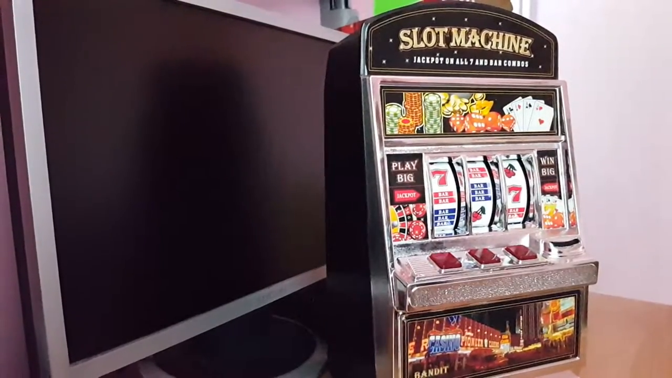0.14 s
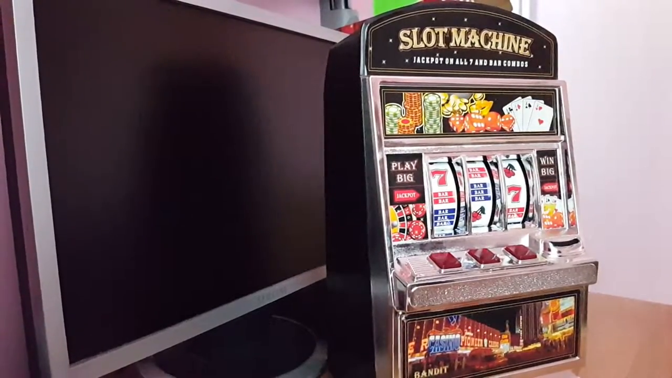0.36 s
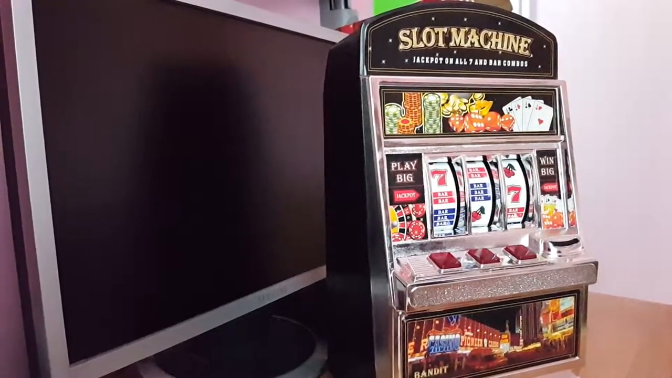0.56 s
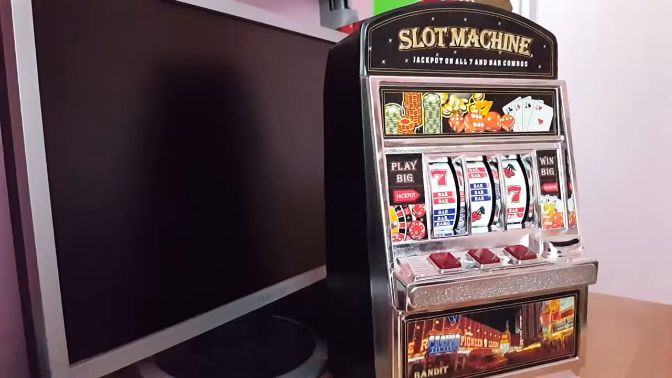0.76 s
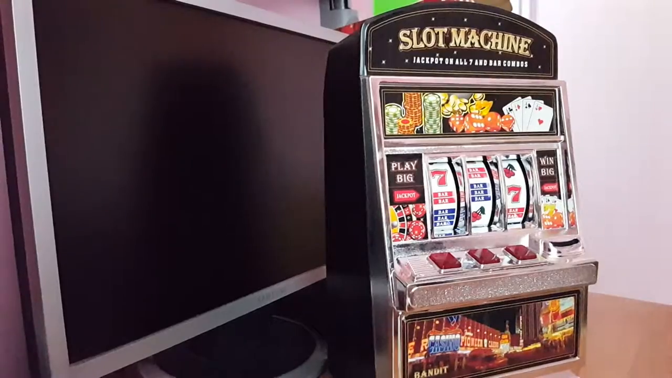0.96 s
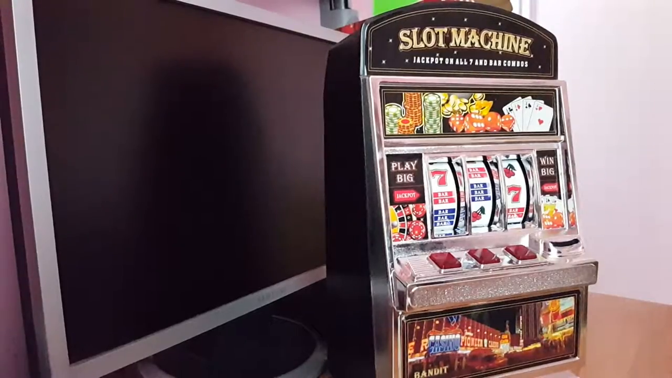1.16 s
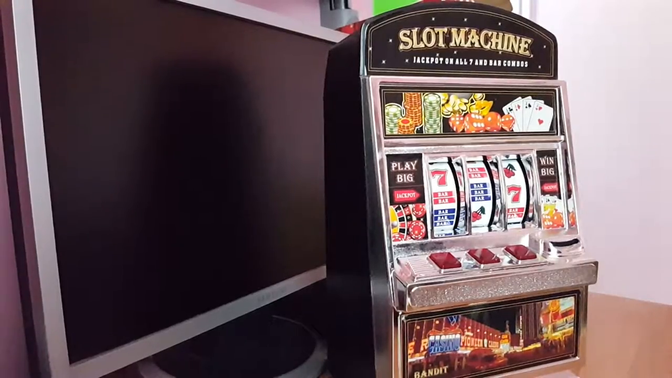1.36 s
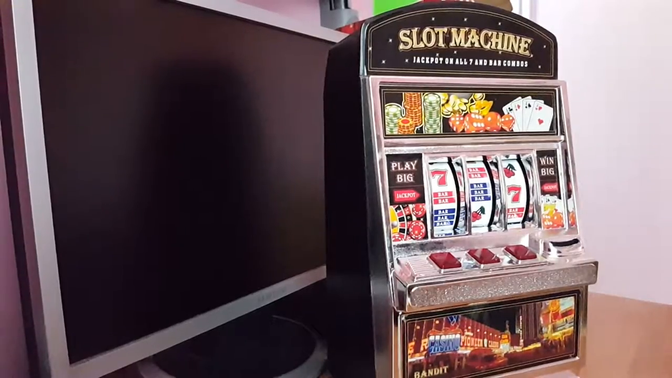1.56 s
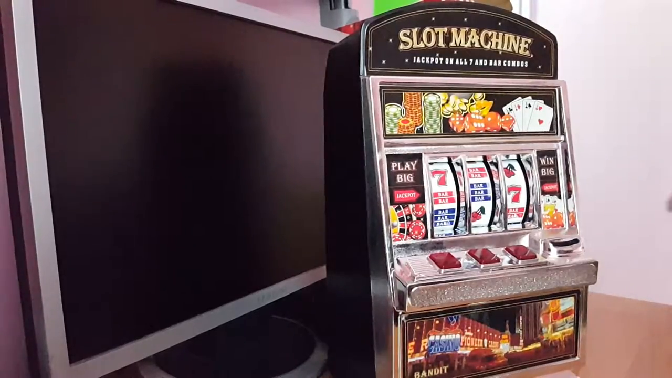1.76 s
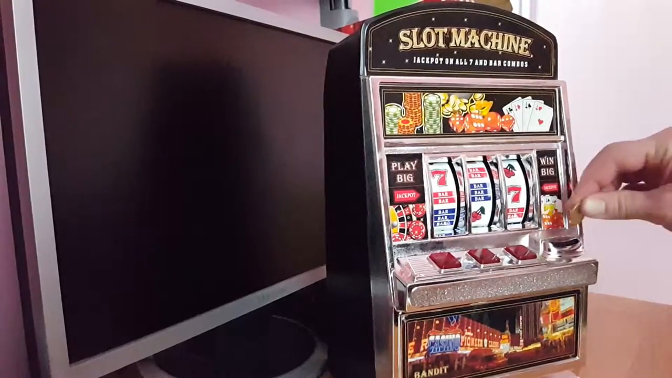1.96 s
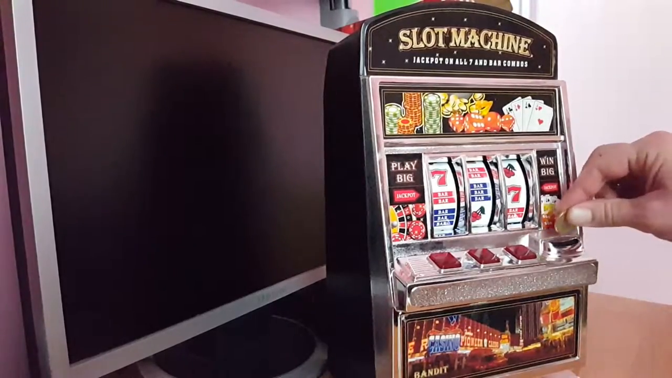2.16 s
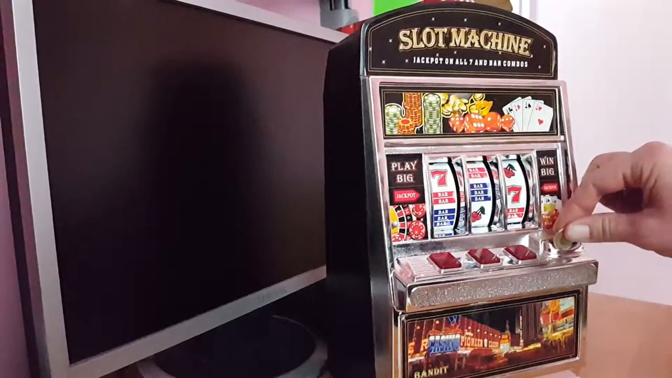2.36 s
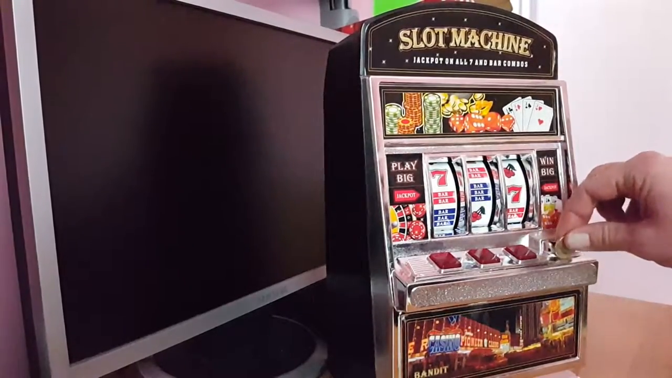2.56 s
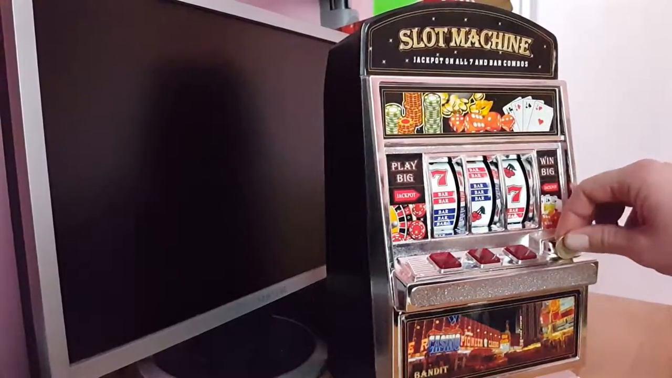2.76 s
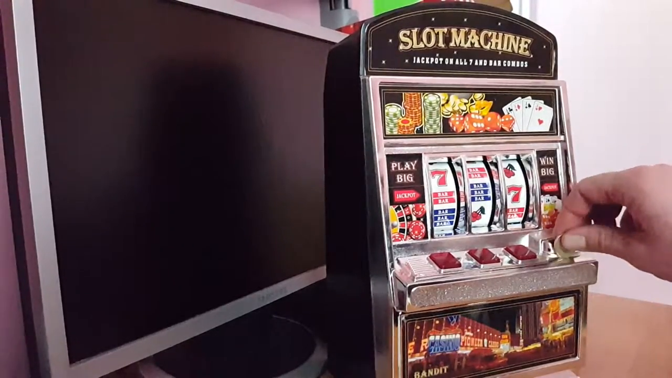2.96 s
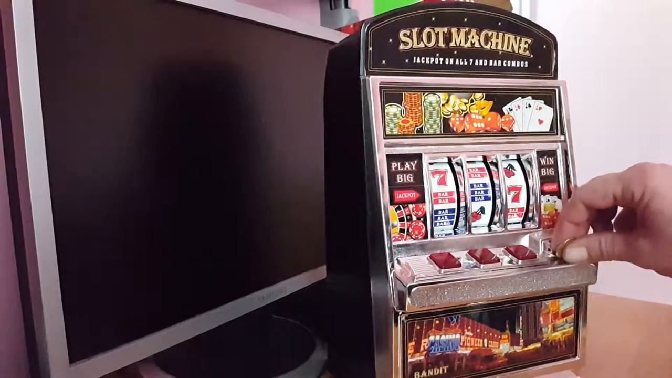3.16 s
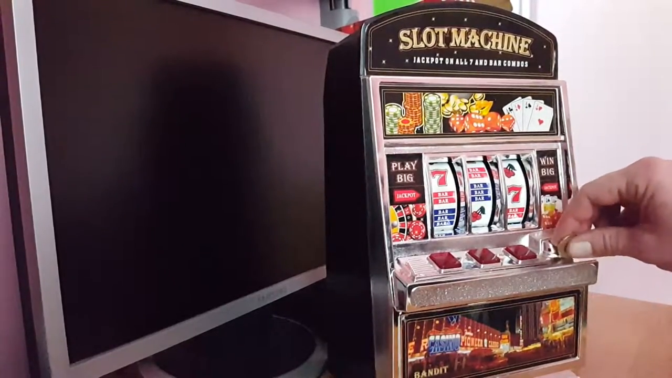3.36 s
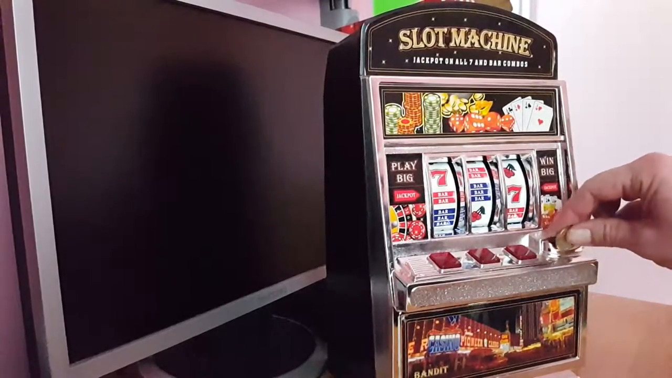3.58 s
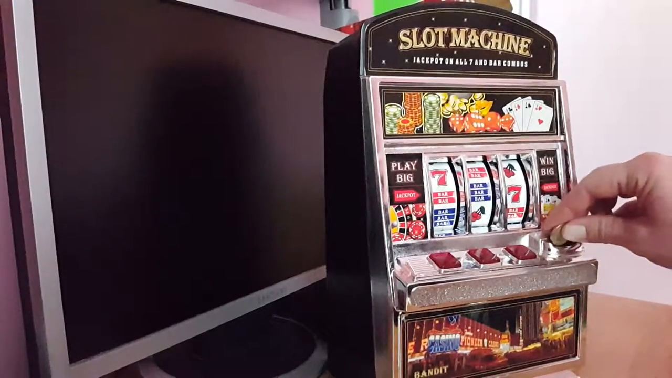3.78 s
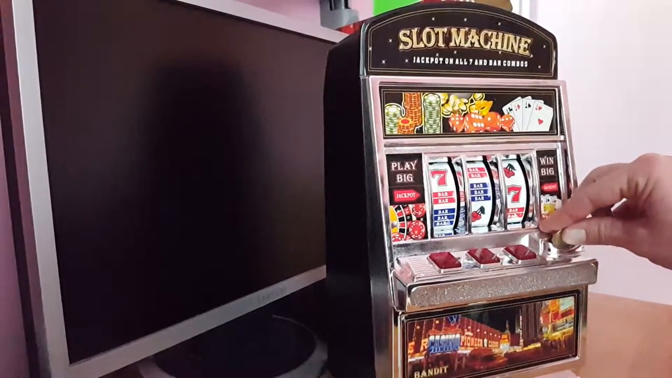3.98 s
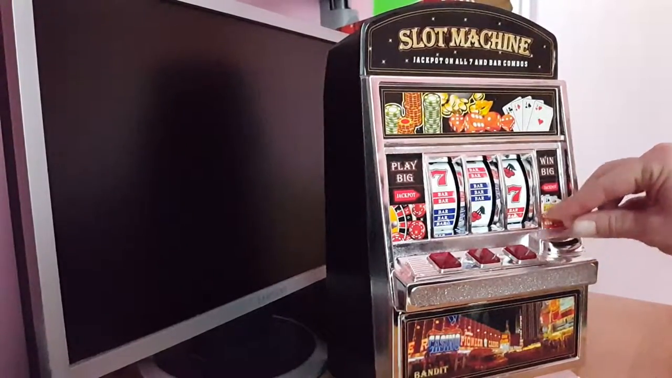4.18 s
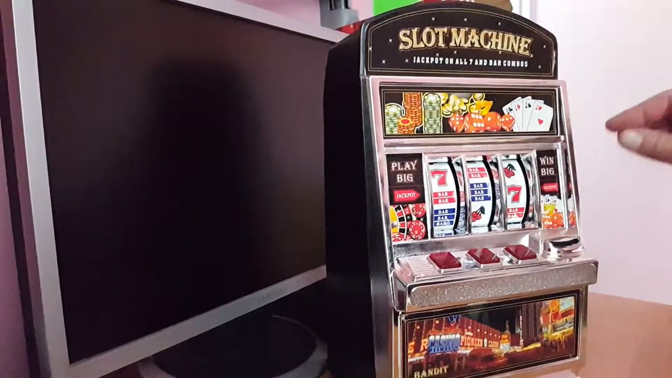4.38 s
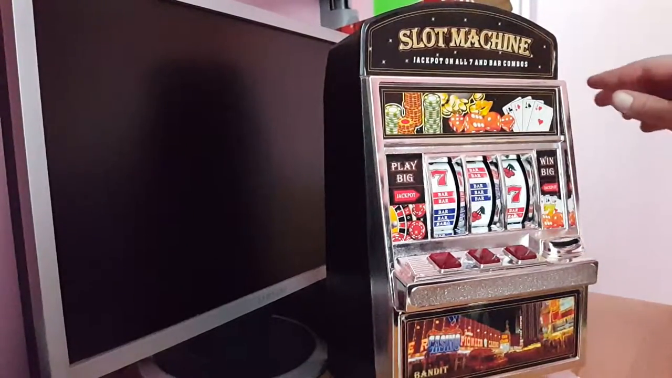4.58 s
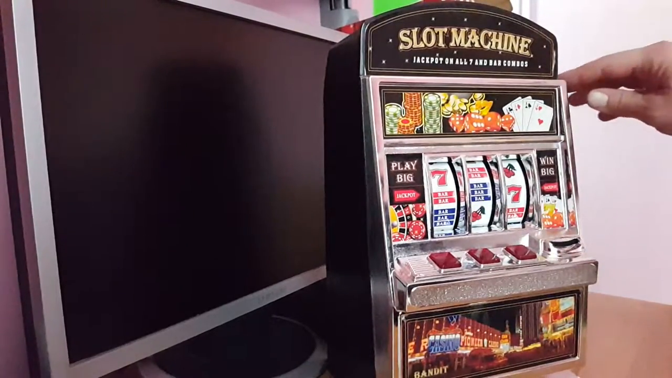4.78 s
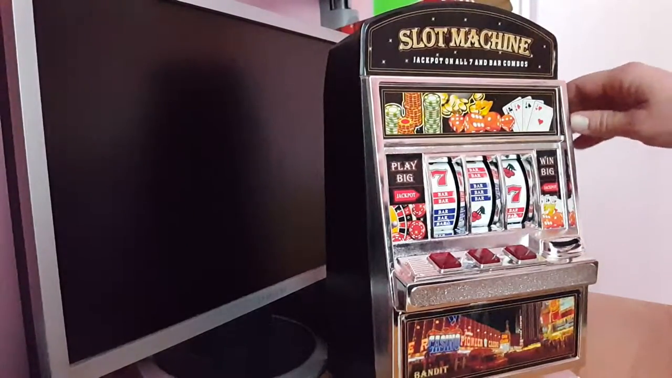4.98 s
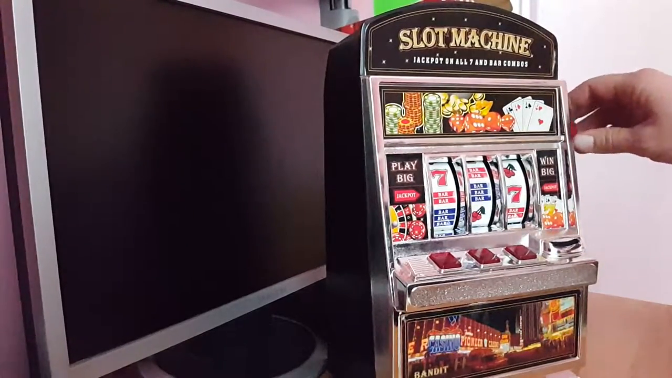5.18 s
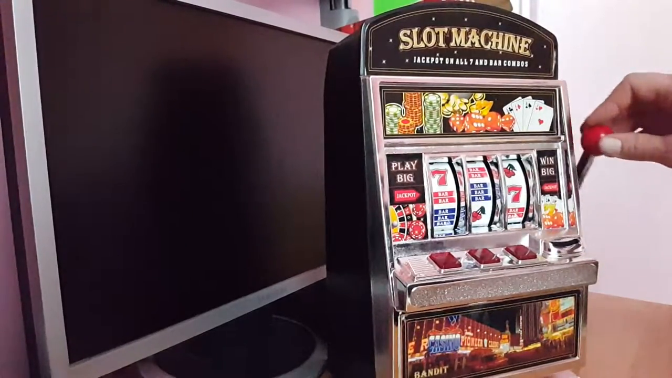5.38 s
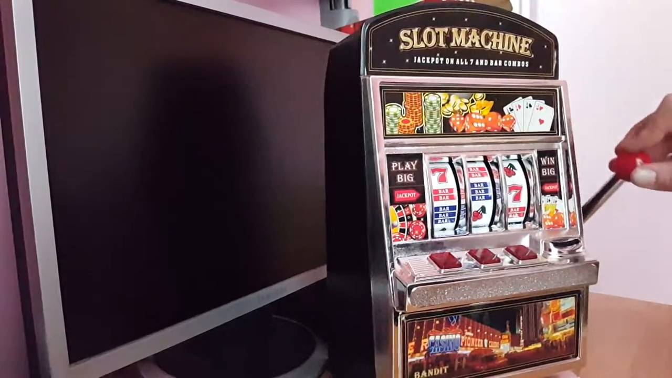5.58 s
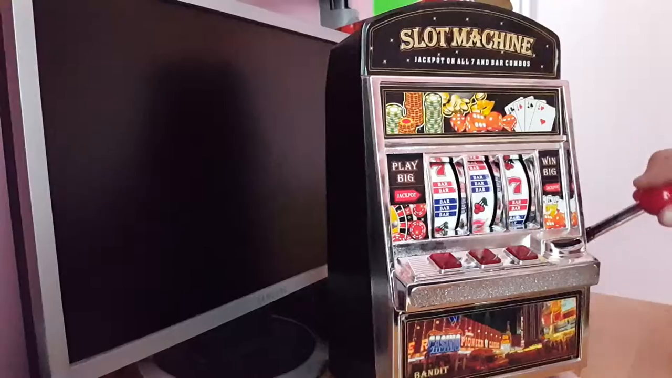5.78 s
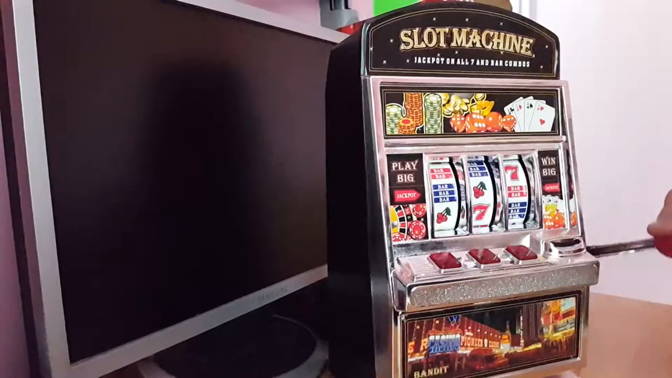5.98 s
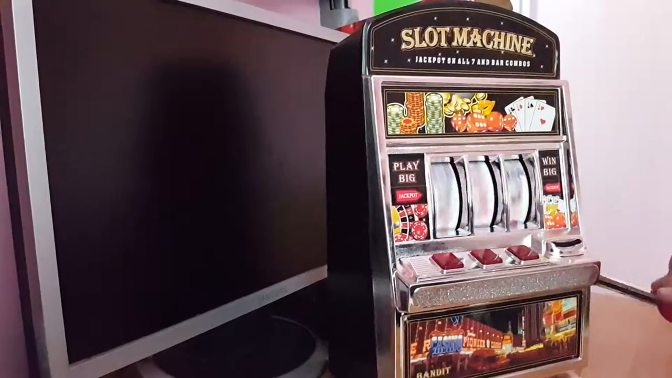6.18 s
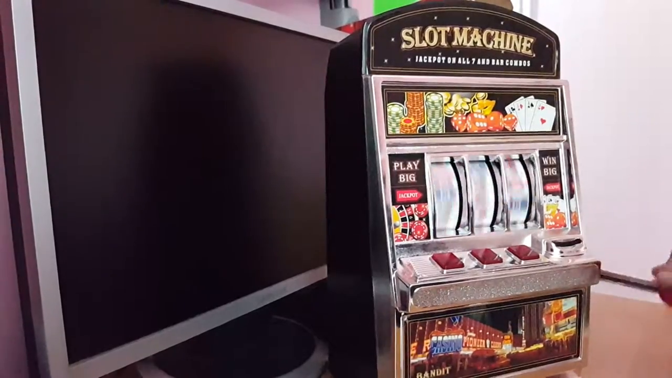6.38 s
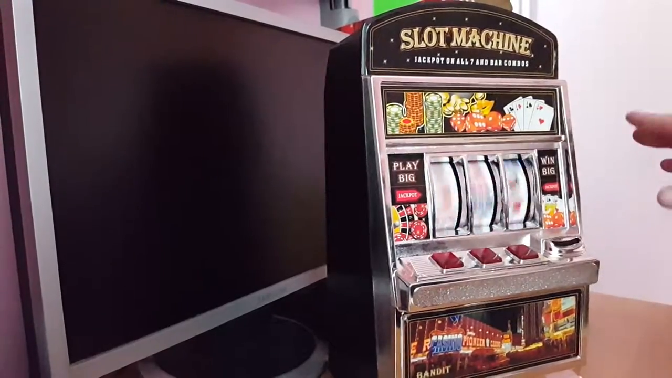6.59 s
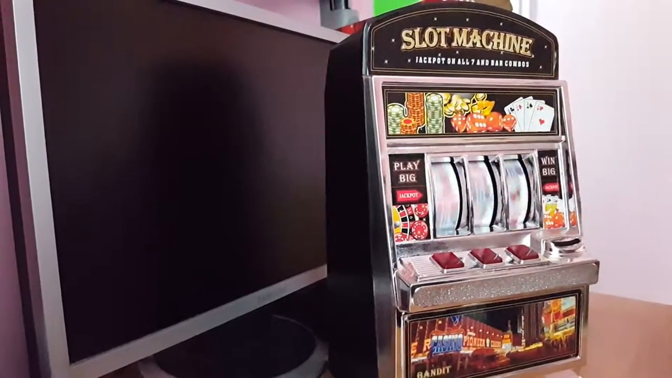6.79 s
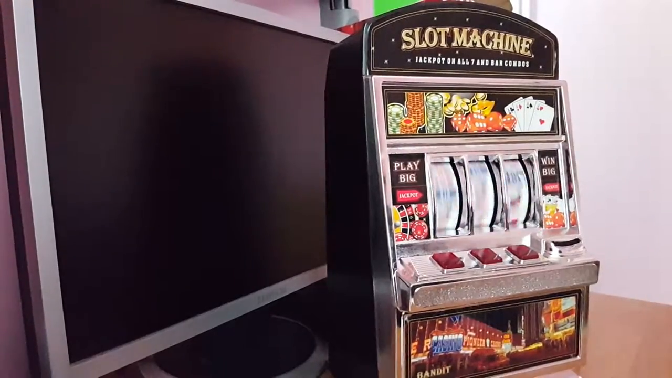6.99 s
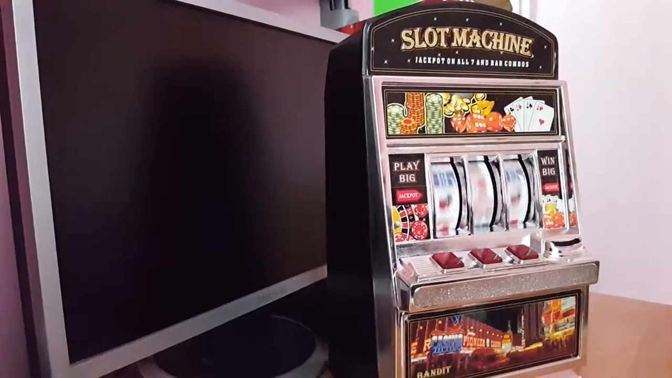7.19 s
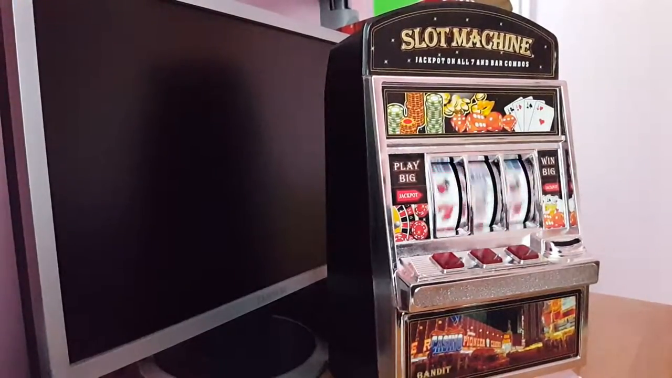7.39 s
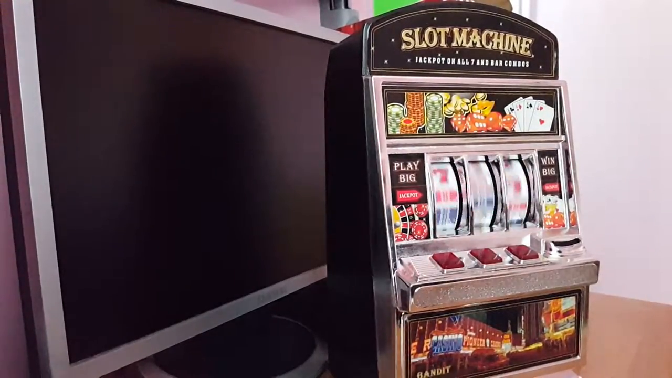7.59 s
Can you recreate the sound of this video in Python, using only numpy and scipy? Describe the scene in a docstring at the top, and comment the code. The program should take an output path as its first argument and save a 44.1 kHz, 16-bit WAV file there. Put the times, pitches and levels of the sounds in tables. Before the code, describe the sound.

Close up on a desk in a small room: brief coin clicks and scrapes, a short metallic clink, then near silence with a thin whine. A coin taps softly against plastic and tumbles noisily down a chute. The toy's lever creaks and ratchets, a hard clack releases the loose reels, which rattle in the hollow case, and sharp toothed clicking slows as they begin to stop, cutting off while still active.

```python
"""First a hand fumbles with coins on a desk, in a small room with a faint electrical whine.
One coin is lifted, tapped against the slot of a plastic toy slot machine and tumbles down inside.
The lever is pulled over its gears and trips the reels, which whirl and rumble.
A pawl (a small catch) chatters over a slowing ratchet (a toothed wheel).
Solid sounds are tiny noise blows, tinted by the struck object and followed by the room's answer."""
import sys
import numpy as np
from scipy import signal
from scipy.fft import rfft, irfft
from scipy.io import wavfile
from scipy.ndimage import uniform_filter1d

SR = 44100
rng = np.random.default_rng(int(sys.argv[2]) if len(sys.argv) > 2 else 0)


def materialize(psi):
    """Save the field psi as 16-bit PCM at rate SR to the path in sys.argv[1].

    A 1-D psi becomes a single channel; in a 2-D psi each row is a channel.
    """
    bounded = np.clip(np.atleast_2d(psi).T, -1, 1)
    quanta = np.round(bounded * 32767).astype(np.int16)
    wavfile.write(sys.argv[1], SR, quanta)


N = 336924
TIME = np.arange(N) / SR  # seconds
HZ = np.fft.rfftfreq(8192, 1 / SR)  # frequencies at which filters are drawn

# Single blows. hits() adds a trim to every level; bass and treble set how boomy and how bright each blow is.
# coins handled on the desk: (t/s, level before trim/dB, bass weight/dB, treble weight/dB)
PICKS = [(0.097, -33, -3, -24), (0.114, -13.5, -18.5, -8.5), (0.122, -15.5, -7, -4),
         (0.587, -47, -11.5, -17), (0.908, -48.5, -22, -24), (0.999, -29, 10, -16.5),
         (1.034, -37.5, 13, -18), (1.226, -29.5, -32, -27)]
# coin feeling for the slot: (t/s, level before trim/dB, bass weight/dB, treble weight/dB)
TAPS = [(2.383, -23.5, -3, -14.5), (2.602, -22.5, -5.5, -18.5), (2.852, -31.5, -9.5, -27.5),
        (3.046, -41.5, 6.5, -29), (3.437, -43, 7, -33.5), (3.555, -24.5, -15.5, -22),
        (3.608, -28.5, -12, -21), (4.073, -42, -8, -34), (4.12, -36.5, -11.5, -18.5),
        (4.137, -31.5, -14, -20)]
# coin tumbling down the chute: (t/s, level before trim/dB, bass weight/dB, treble weight/dB)
TUMBLE = [(4.173, -8.5, -7.5, -12.5), (4.217, -16, -12.5, -9.5), (4.229, -21.5, -17, -17.5),
          (4.27, -7.5, -7.5, -17.5), (4.287, -11, -6, -16.5), (4.323, -7, -20, -7),
          (4.384, -14.5, -15, -5.5), (4.403, -13, -23, -14), (4.433, -17.5, -14, -10.5),
          (4.457, -10.5, -8, -23), (4.487, -12.5, -9, -8.5), (4.559, -20.5, -11, -10)]
# lever, latches and reel catches knocking in the case:
# (t/s, level before trim/dB, bass weight/dB, treble weight/dB)
KNOCKS = [(5.041, -40, 10, -53), (5.248, -38, -9.5, -25), (5.272, -32.5, 0.5, -22), (5.385, -43, -6, -22),
          (5.518, -34, -9, -24), (5.559, -25, -13.5, -22), (5.576, -29, -15, -19),
          (5.68, -24.5, -11, -17.5), (5.745, -22, -8.5, -17.5), (5.767, -28, -5, -25),
          (5.83, -14.5, -16, -19.5), (5.862, -16.5, -11.5, -34), (6.187, -1, -15.5, -14),
          (6.21, -5.5, -7.5, -14.5), (6.237, -10.5, -7.5, -17), (6.607, -10, -19.5, -10)]
# single catches of the pawl: (t/s, level before trim/dB, bass weight/dB, treble weight/dB)
CATCHES = [(6.952, -9.5, -4.5, -13), (7.263, -12, -7, -6.5), (7.316, -8, -6, -7.5),
           (7.443, -9.5, -9.5, -11), (7.462, -14, -2, -14.5), (7.504, -15, -15, -16),
           (7.562, -11.5, -17, -13), (7.598, -14, -17, -19)]

# Movements.
# coins pushed over the desk: (start t/s, end t/s, starting level/dB, swell over the push/dB)
SLIDES = [(.19, 0.265, -40.5, -10), (0.48, .68, -64, -3), (0.895, 0.98, -58.5, 2.5), (1.0, 1.107, -49, -2),
          (1.11, 1.129, -48, 3.5), (1.204, 1.221, -55, 13.5)]
SLIDE_ATTACK_S, SLIDE_FADE_DB_PER_S = 0.0085, 355
# hand leaning on the desk top: (start t/s, end t/s, starting level/dB, swell over the push/dB)
LEANS = [(0.087, 0.416, -48.5, -9), (0.788, 0.855, -58, -1), (1.078, 1.187, -56, -0.5)]
LEAN_ATTACK_S, LEAN_FADE_DB_PER_S = 0.02, 125
# lever against its spring: (start t/s, end t/s, starting level/dB, swell over the pull/dB)
PULLS = [(5.546, 5.568, -37, 4.5), (5.749, 5.821, -34, -2.5), (5.829, 6.114, -30, 9)]
PULL_ATTACK_S, PULL_FADE_DB_PER_S = 0.0046, 297
PULL_SHAKE_DB = -4.5  # force shaking the case, relative to the lever's effort
GEAR_TEETH_PER_S = 65  # typical rate; the pull is unsteady around it
# the reels are flung off with a wobble that settles, and then coast
SPIN_S, WOBBLE_SETTLE_S, COAST_DB_PER_S = 6.2, 0.22, 0.5
# the stop gear drags on the reels until the first one halts
BRAKE_S, HALT_S = 6.83, 7.335
# pawl on the slowing ratchet: (t/s, speed/teeth per s, level/dB)
PAWL = [(6.975, 94, -30), (6.995, 89, -18), (7.085, 75, -15.5), (7.16, 52, -17), (7.195, 44.2, -25.5),
        (7.25, 40, -31)]

# Colours: how strong each pitch range is, before the whole is scaled to a common strength.
# coins on the desk: (f/Hz, relative level per Hz/dB)
PICK_COLOUR = [(59, -38.5), (100, -10.5), (188, -28), (270, -3.5), (420, -23), (487, -3), (589, 1.5),
               (808, -14.5), (977, -10), (1800, -21), (2370, -8.5), (2750, -15.5), (5630, -8.5),
               (15500, -40)]
# coin sliding on the desk: (f/Hz, relative level per Hz/dB)
SLIDE_COLOUR = [(200, -23), (560, 1), (780, 0.5), (1020, 2.5), (1500, -5), (2800, -3), (4200, -5.5),
                (5800, -10), (8000, -22.5), (11000, -33), (16000, -26)]
# desk under the leaning hand: (f/Hz, relative level per Hz/dB)
BOOM_COLOUR = [(30, -12), (70, -8), (135, 1.5), (200, -6), (320, -18), (700, -40)]
# coin against the slot: (f/Hz, relative level per Hz/dB)
TAP_COLOUR = [(88, -52), (150, -20.5), (339, 2.5), (530, -14), (607, 3.5), (751, -9.5), (1040, -9),
              (1200, -20), (1420, -11.5), (1630, -17.5), (2360, -17.5), (15500, -57.5)]
# coin in the chute: (f/Hz, relative level per Hz/dB)
TUMBLE_COLOUR = [(70, -43), (125, -12), (200, -11), (260, -1.5), (430, -6.5), (640, -5), (850, -8.5),
                 (1050, 0.5), (1280, -9.5), (1800, -4.5), (3000, -13), (4200, -15.5), (8500, -27),
                 (10500, -37.5), (13500, -33), (16000, -37)]
# knocks in the case: (f/Hz, relative level per Hz/dB)
KNOCK_COLOUR = [(35, -55), (70, -7), (140, 2.5), (320, 7), (520, -0.5), (830, -8.5), (1050, -7),
                (1250, -14), (1700, -7), (3300, -16), (3900, -21), (7700, -26), (10500, -37),
                (13000, -32.5), (16000, -40.5)]
# lever gears: (f/Hz, relative level per Hz/dB)
PULL_COLOUR = [(240, -26), (400, 0.5), (511, -10.5), (914, -4.5), (1030, -7), (1240, -7.5), (2120, 0.5),
               (2750, -5), (7670, -15.5), (10100, -32), (15500, -27)]
# rumbling hollow case: (f/Hz, relative level per Hz/dB)
RUMBLE_COLOUR = [(21, -83), (35, -56), (70, -24), (129, -3.5), (183, -11.5), (308, -3), (382, -13.5),
                 (420, -9.5), (600, -27), (780, -44), (1320, -120)]
# reels on their axle: (f/Hz, relative level per Hz/dB)
AXLE_COLOUR = [(300, -24.5), (450, -8.5), (750, -7), (1060, 0.5), (1300, -5), (1800, 0), (2700, -6.5),
               (3600, -14), (4700, -11.5), (5600, -17), (8000, -26), (10500, -38), (13000, -34.5),
               (16000, -46.5)]
# pawl on the ratchet: (f/Hz, relative level per Hz/dB)
PAWL_COLOUR = [(150, -36), (290, -3.5), (540, -18.5), (850, -6.5), (1250, -12.5), (1650, 0), (2100, -10),
               (2800, 2), (3500, -14.5), (4300, -4), (5300, -15), (6300, -15.5), (8000, -20), (10500, -32),
               (16000, -31.5)]

# Resonances. Lifts raise a colour; hits() varies them from blow to blow.
# plastic case: (f/Hz, width/Hz, nominal lift/dB)
CASE = [(140.4, 23, 7.5), (227.4, 15, 7.5), (255.5, 16, 3.5), (312.3, 6.2, 8.5), (348.5, 21, 11),
        (432, 15, 7.5), (614, 28, 12), (702, 38, 8.5), (1057, 78, 9), (1126, 49, 5), (1770, 70, 1),
        (2100, 42, -1.5)]
# ratchet wheel: (f/Hz, width/Hz, nominal lift/dB)
WHEEL = [(311, 24, 13.4), (854, 34, 10.2), (1510, 70, 4.9), (2490, 64, 6.4), (2750, 40, 5), (3010, 60, 6.6),
         (4110, 117, 10.2), (4840, 150, 6.5), (6080, 140, 11), (6730, 91, 2.8)]
# coin as it leaves the desk: (f/Hz, width/Hz, relative level/dB)
COIN = [(2140, 63, 2), (2700, 230, -8.5), (3220, 150, -7), (4280, 390, -13.5), (5340, 180, -16)]
# desk top under light finger taps: (f/Hz, width/Hz, relative level/dB)
DESK = [(580, 83, 1), (1026, 78, -0.5)]
# squeaking pivot of the lever: (f/Hz, width/Hz, relative level/dB)
PIVOT = [(1126, 16, -0.5), (1720, 150, -21), (2340, 80, -13), (2820, 42, -11), (3200, 60, -12),
         (3700, 51, -14), (3960, 75, -11), (4350, 90, -11.5), (4830, 150, -17)]

# Room and listening points.
# room decay: (f/Hz, time to fall by 60 dB/s)
ROOM = [(120, 0.55), (320, 0.38), (840, 0.22), (2200, 0.25), (5800, 0.2), (14000, 0.15)]
# room air: (f/Hz, relative level per Hz/dB)
AIR = [(15, -30), (50, -3), (75, -17), (135, -1.5), (180, -13.5), (260, -7), (400, -18.5), (900, -22),
       (2700, -26.5), (5000, -31.5), (10000, -44), (13000, -40), (16000, -41.5)]
AIR_DB = -62.5  # rms, before the ports
# steady electrical tones: (f/Hz, rms level before the ports/dB)
WHINE = [(134.6, -74), (484.5, -79.5), (1362, -69.5), (2724, -80)]
# how alike the noise is at the two microphone ports: (f/Hz, likeness from 0 to 1)
LIKENESS = [(170, .995), (330, .96), (640, .76), (1400, .66), (3100, .45), (7000, .15)]
# balance of the two ports: (f/Hz, left minus right/dB)
TILT = [(100, 2.5), (450, 2.7), (1200, 1.6), (3300, 1), (5500, 0), (8000, 11), (10000, 11), (13000, 6)]
EDGE_HZ = 16050  # upper end of the sound


def amp(db):
    """Turns decibels into a gain."""
    return 10 ** (np.asarray(db) / 20)


def unit(x):
    """Scales to an rms of one."""
    return x / np.sqrt(np.mean(x ** 2) + 1e-20)


def read(points, hz):
    """Reads a table between its points on a log-frequency axis."""
    f, value = np.transpose(points)
    return np.interp(np.log(hz + 1), np.log(f + 1), value)


def level(curve):
    """Gain over time from rows of (t/s, level/dB), practically silent outside them."""
    s, db = np.transpose(curve)
    return amp(np.interp(TIME, s, db, left=-150, right=-150))


def add(mix, s, sound):
    """Adds a two-channel sound at time s, cutting it off at the end of the mix."""
    part = mix[:, round(s * SR):][:, :sound.shape[1]]
    part += sound[:, :part.shape[1]]


def shape(colour, modes=()):
    """Gain by frequency: a broad colour lifted at each resonance."""
    lifts = sum(db / (1 + (2 * (HZ - hz) / width) ** 2) for hz, width, db in modes)
    return amp(read(colour, HZ) + lifts)


def ringing(modes):
    """Gain by frequency of an object that sounds mainly around its resonances."""
    total = 0
    for k, (hz, width, db) in enumerate(modes):
        total = total + (-1) ** k * amp(db) / (1 + 2j * (HZ - hz) / width)  # signs alternate
    return abs(total)


def coloured(x, gain):
    """Filters with the given gain, never ahead of the blow, so that resonances ring after it."""
    log_gain = np.log(np.maximum(gain, 1e-5))
    circle = np.concatenate([log_gain, log_gain[-2:0:-1]])
    # the Hilbert transform gives the phase that puts the energy as early as possible
    spectrum = np.exp(np.conj(signal.hilbert(circle)))
    taps = np.fft.ifft(spectrum).real[:len(HZ)]
    return signal.fftconvolve(x, taps[None], axes=1)[:, :x.shape[1]]


def diffuse(count, t60=None, size=256):
    """Noise at both ports, alike in the bass; it dies away by band if t60 is given."""
    hop = size // 2
    hz = np.fft.rfftfreq(size, 1 / SR)
    t = np.arange(count // hop + 2) * hop / SR
    a, b, c, d = np.moveaxis(rng.standard_normal((len(t), len(hz), 4)), -1, 0)
    same = np.clip(read(LIKENESS, hz), -1, 1)
    left = a + 1j * b
    right = same * left + np.sqrt(1 - same ** 2) * (c + 1j * d)
    z = np.array([left, right])
    if t60 is not None:
        z = z * amp(-60 * t[:, None] / read(t60, hz))
    noise = signal.istft(z, nperseg=size, time_axis=1, freq_axis=2)[1]
    return unit(noise[:, :count])


def blow(ring_t60, room_db, count=20000):
    """One contact of energy one: a quickly dying noise burst (many dense modes) and the room's answer."""
    t = np.arange(count) / SR
    burst = unit(diffuse(count) * amp(-60 * t / ring_t60) * (1 - np.exp(-t / 0.00082)))
    tail = unit(diffuse(count, ROOM) * (1 - np.exp(-t / 0.0026)))
    return unit(burst + amp(room_db) * tail) / np.sqrt(count)


def hits(rows, colour, modes, ring_t60, room_db, trim_db):
    """Single blows on one object; each wakes the resonances differently and is more or less boomy or bright."""
    out = np.zeros((2, N))
    bands = [(HZ > 150) & (HZ < 700), HZ > 3500]  # bass, treble
    for s, db, bass, treble in rows:
        # each blow lands elsewhere, so it wakes the resonances differently
        struck = [(hz, width, lift * rng.uniform(0.2, 1.2)) for hz, width, lift in modes]
        gain = shape(colour, struck)
        band_power = [np.sum(gain[band] ** 2) / np.sum(gain ** 2) for band in bands]
        usual_bass, usual_treble = 10 * np.log10(band_power)
        # tilt the colour by how far the weights differ from the usual ones
        shade = read([(450, bass - usual_bass), (1100, 0), (2200, 0), (4500, treble - usual_treble)], HZ)
        size = amp(db + trim_db) * np.sqrt(0.0035 * SR)  # energy of that level held for 3.5 ms
        add(out, s, size * coloured(blow(ring_t60, room_db), unit(gain * amp(shade))))
    return out


def contacts(per_s, spread_db):
    """Random small impacts of uneven strength, scaled to an rms of one."""
    strength = amp(spread_db * np.clip(rng.standard_normal(N), -2, 2))
    return unit((rng.random(N) < per_s / SR) * strength)


def teeth(speed):
    """One click, of unit power on average, each time a tooth passes; speed in teeth per second."""
    passed = np.floor(np.cumsum(speed) / SR)
    return np.diff(passed, prepend=0) * np.sqrt(SR / np.maximum(speed, 1))


def rattle(force, gain, ring_t60, room_db, count=6):
    """Impacts land on several spots of an object, each ringing in its own way."""
    spot = rng.integers(0, count, N)
    out = np.zeros((2, N))
    for k in range(count):
        here = (force * (spot == k))[None]
        out += signal.oaconvolve(here, blow(ring_t60, room_db), axes=1)[:, :N]
    return coloured(out, unit(gain))


def stroke(start, end, db, swell_db, attack_s, fade_db_per_s):
    """Gain of one movement: it sets in, swells (or, if negative, sinks) steadily, then fades."""
    onset = np.clip((TIME - start) / attack_s, 0, 1)
    progress = np.clip((TIME - start) / max(end - start, attack_s), 0, 1)
    return onset * amp(db + swell_db * progress - fade_db_per_s * np.maximum(TIME - end, 0))


def background():
    """Still room air as coloured noise, and the steady sine tones of electronics nearby."""
    tones = 0
    for hz, db in WHINE:
        tones = tones + np.sqrt(2) * amp(db) * np.sin(2 * np.pi * (hz * TIME + rng.random()))
    return amp(AIR_DB) * coloured(diffuse(N), unit(shape(AIR))) + tones


def clink(s, db):
    """The coin rings briefly at its own resonances as it leaves the desk."""
    out = np.zeros((2, N))
    add(out, s, amp(db) * coloured(blow(ring_t60=0.018, room_db=-3.5), unit(ringing(COIN))))
    return out


def pick_up():
    """A hand leans on the desk, fumbles with coins, pushes them about and lifts one."""
    push = sum(stroke(*row, SLIDE_ATTACK_S, SLIDE_FADE_DB_PER_S) for row in SLIDES)
    weight = sum(stroke(*row, LEAN_ATTACK_S, LEAN_FADE_DB_PER_S) for row in LEANS)
    fidget = stroke(0.22, 0.78, db=-57, swell_db=-10, attack_s=0.01, fade_db_per_s=55)
    picks = hits(PICKS, PICK_COLOUR, [], ring_t60=0.028, room_db=-5.0, trim_db=-0.5)
    slide = rattle(contacts(2000, 2.5) * push, shape(SLIDE_COLOUR), ring_t60=0.02, room_db=-5.5)
    fingers = rattle(contacts(35, 4.9) * fidget, ringing(DESK), ring_t60=0.035, room_db=-4.5, count=2)
    boom = rattle(contacts(400, 1.5) * weight, shape(BOOM_COLOUR), ring_t60=0.038, room_db=-9.0, count=3)
    return picks + slide + fingers + boom + clink(1.225, db=-1.0)


def coin():
    """The coin feels for the slot and falls through the case, skittering harder as it gathers speed."""
    taps = hits(TAPS, TAP_COLOUR, [], ring_t60=0.041, room_db=-6.0, trim_db=-0.5)
    fall = hits(TUMBLE, TUMBLE_COLOUR, CASE, ring_t60=0.036, room_db=-1.5, trim_db=-0.5)
    chute = shape(TUMBLE_COLOUR) * (HZ / 1000) ** 0.22  # light touches are brighter than falls
    speed = stroke(4.175, 4.5, db=-43.5, swell_db=12.5, attack_s=0.005, fade_db_per_s=240)
    skitter = rattle(contacts(250, 5.3) * speed, chute, ring_t60=0.012, room_db=1.0, count=3)
    return taps + fall + skitter


def case_rumble(shake):
    """The hollow case rumbles as hard as the works shake it."""
    return rattle(contacts(900, 4.2) * shake, shape(RUMBLE_COLOUR, CASE), ring_t60=0.017, room_db=-8, count=8)


def lever():
    """The lever squeaks on its pivot, grinds over gear teeth, shakes the case and knocks latches open."""
    rub = stroke(5.678, 5.715, db=-30.5, swell_db=-5, attack_s=0.0048, fade_db_per_s=257)
    squeak = rattle(contacts(2800, 2) * rub, ringing(PIVOT), ring_t60=0.0069, room_db=-8.5, count=2)
    effort = sum(stroke(*row, PULL_ATTACK_S, PULL_FADE_DB_PER_S) for row in PULLS)
    unsteady = unit(uniform_filter1d(rng.standard_normal(N), size=900))  # smoothed over about 20 ms
    gear_clicks = teeth(GEAR_TEETH_PER_S * amp(3.5 * unsteady))
    cogs = gear_clicks * amp(-5.0) + contacts(450, 2.9) * amp(-2.0)
    gears = rattle(cogs * effort, shape(PULL_COLOUR, CASE), ring_t60=0.022, room_db=-6)
    knocks = hits(KNOCKS, KNOCK_COLOUR, CASE, ring_t60=0.067, room_db=0.5, trim_db=-1.5)
    return squeak + gears + case_rumble(effort * amp(PULL_SHAKE_DB)) + knocks


def spin(db, wobble_db):
    """Gain of the free-running reels: louder while they wobble, then slowly running down."""
    age = np.maximum(TIME - SPIN_S, 0)
    wobble = wobble_db * np.exp(-age / WOBBLE_SETTLE_S)
    return (TIME > SPIN_S) * amp(db + wobble - COAST_DB_PER_S * age)


def reels():
    """Loose reels rattle on their axle and shake the hollow case, both harder under the brake."""
    drag = stroke(BRAKE_S, HALT_S, db=-34, swell_db=9, attack_s=0.0097, fade_db_per_s=652)
    shake = np.hypot(spin(db=-33.5, wobble_db=6.5), drag)  # powers add
    looseness = np.hypot(spin(db=-33.5, wobble_db=9.5), drag * amp(-2.5))
    axle_gain = shape(AXLE_COLOUR, CASE)
    axle = rattle(contacts(420, 4.4) * looseness, axle_gain, ring_t60=0.01, room_db=1.5, count=5)
    return case_rumble(shake) + axle


def ratchet(bounce_db=-2.0):
    """The pawl snaps over each tooth of a slowing wheel, chatters in between and also catches singly."""
    s, rate, db = np.transpose(PAWL)
    speed = np.interp(TIME, s, rate, left=0, right=0)
    snaps = teeth(speed) * amp(0.7 * rng.standard_normal(N))
    force = snaps + amp(bounce_db) * contacts(900, 3.6)
    loudness = level(np.c_[s, db])
    whirr = rattle(force * loudness, shape(PAWL_COLOUR, WHEEL), ring_t60=0.029, room_db=-4.5, count=4)
    return whirr + hits(CATCHES, PAWL_COLOUR, WHEEL, ring_t60=0.053, room_db=-5.5, trim_db=-6.5)


def scene():
    """Everything on the desk and the room around it."""
    return background() + pick_up() + coin() + lever() + reels() + ratchet()


def record(dry):
    """Two unequal ports: sound reaches the left one three samples later; then the band limit."""
    hz = np.fft.rfftfreq(2 * N, 1 / SR)
    half = amp(read(TILT, hz) / 2)  # half the balance on each side
    lag = np.exp(-2j * np.pi * hz * 3 / SR)
    ports = irfft(rfft(dry, 2 * N) * np.array([half * lag, 1 / half]))[:, :N]
    ports = np.clip(ports, -1, 1)  # peaks are cut off at full scale
    low_pass = signal.firwin(301, EDGE_HZ, window=("kaiser", 9), fs=SR)
    return signal.oaconvolve(ports, low_pass[None], "same")


dry = scene()
out = record(dry)
materialize(out)
```